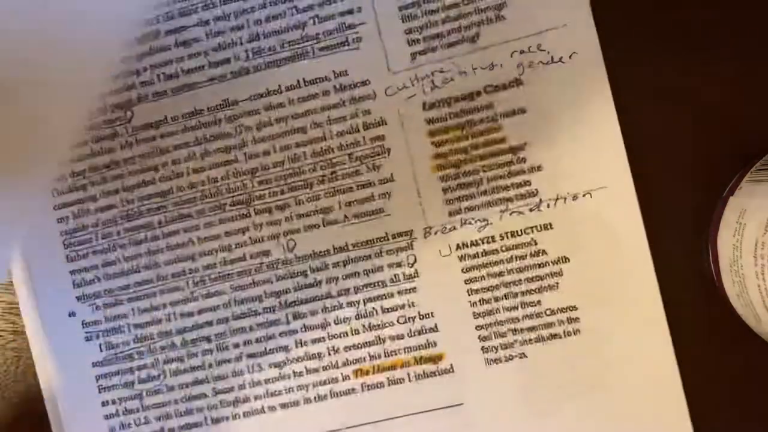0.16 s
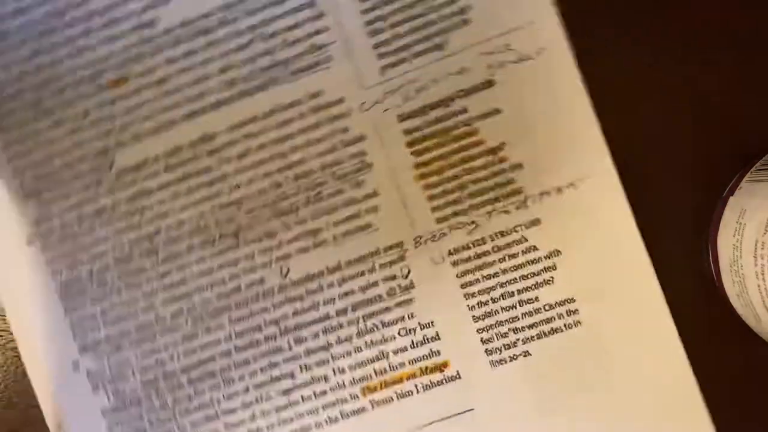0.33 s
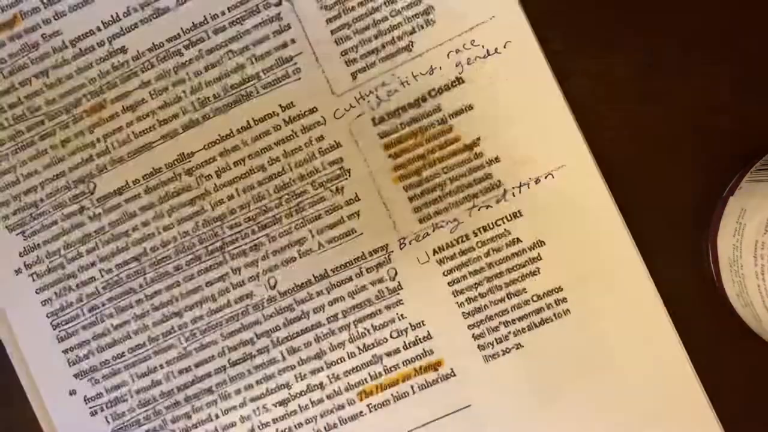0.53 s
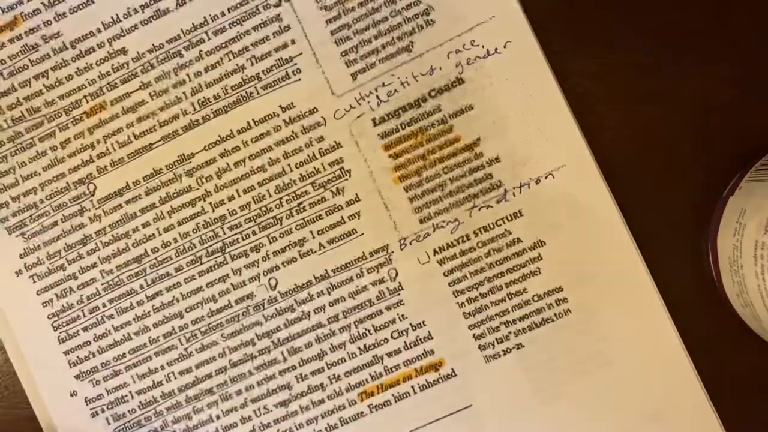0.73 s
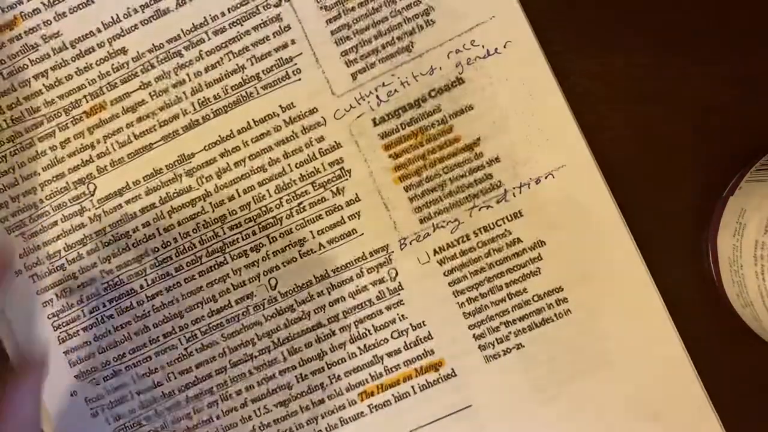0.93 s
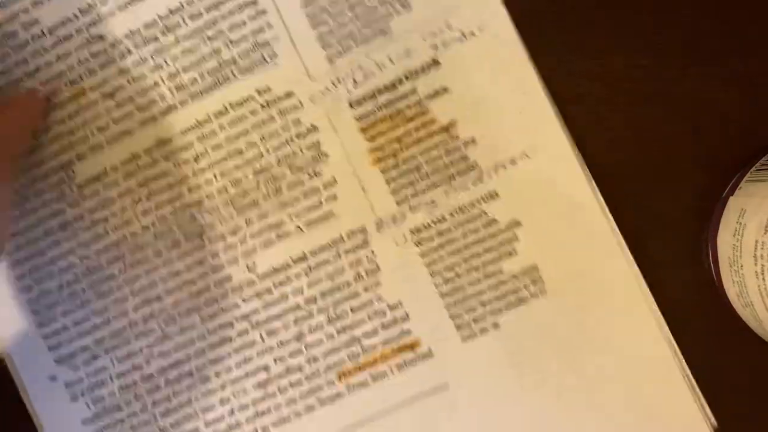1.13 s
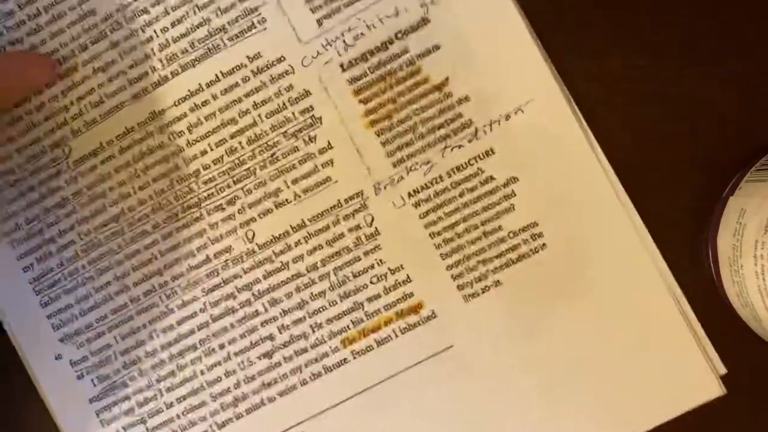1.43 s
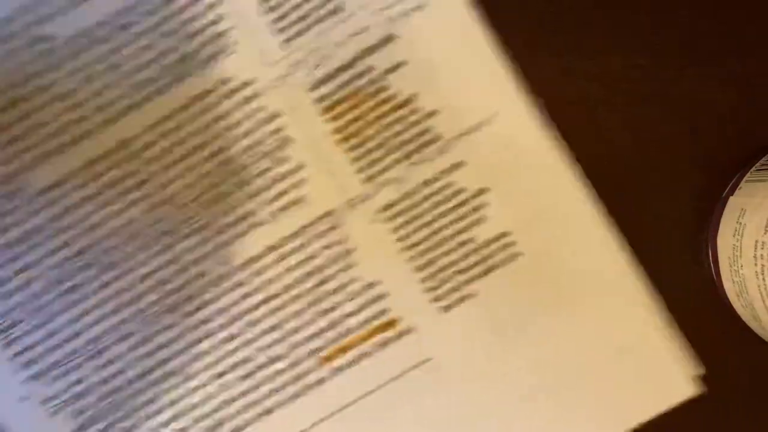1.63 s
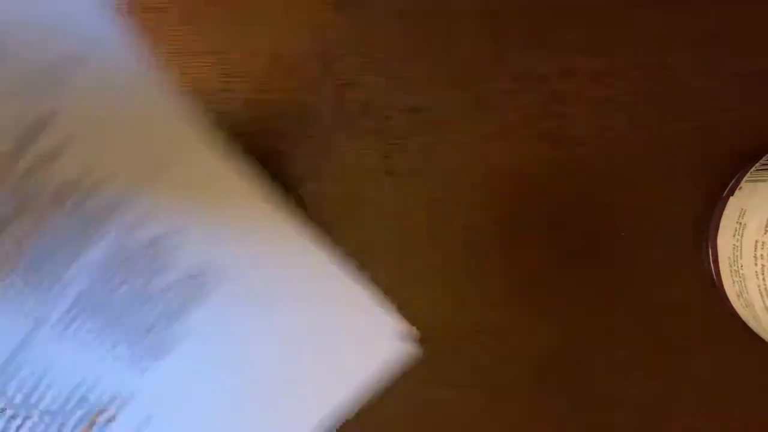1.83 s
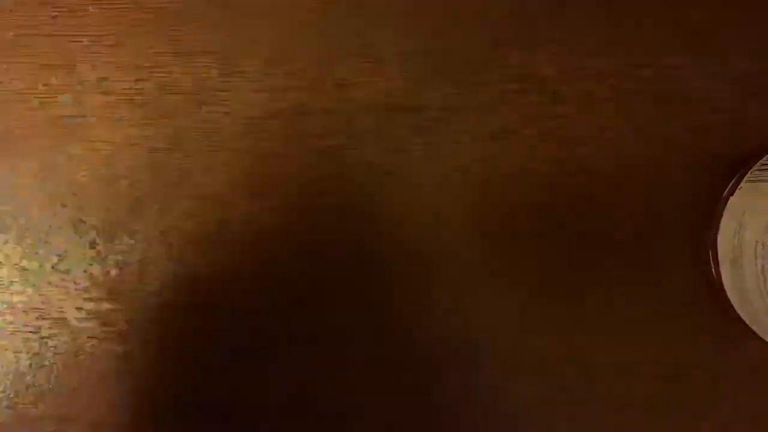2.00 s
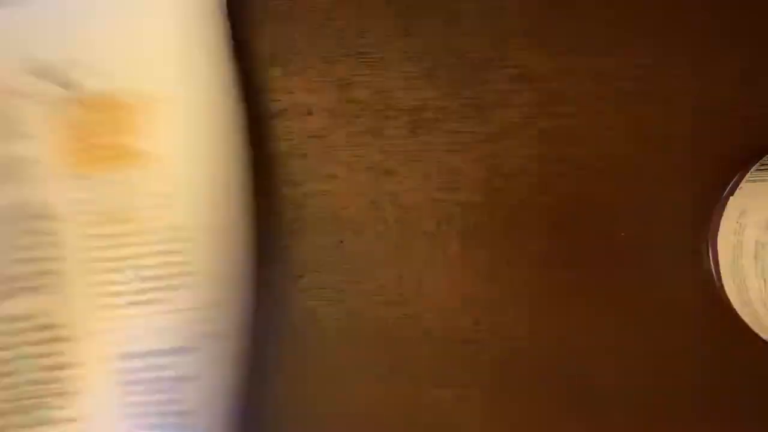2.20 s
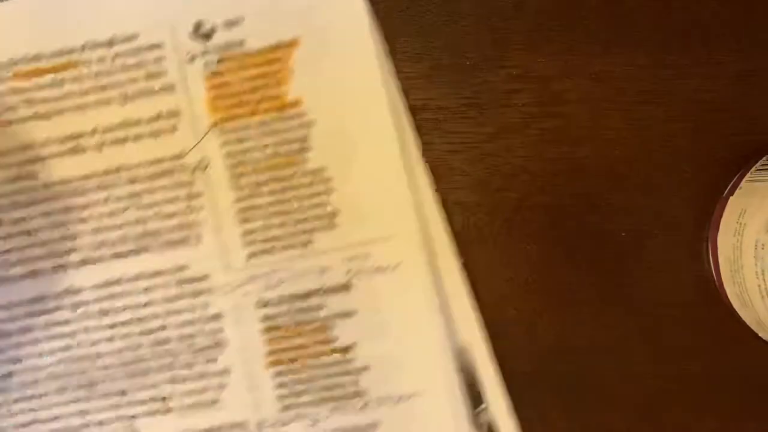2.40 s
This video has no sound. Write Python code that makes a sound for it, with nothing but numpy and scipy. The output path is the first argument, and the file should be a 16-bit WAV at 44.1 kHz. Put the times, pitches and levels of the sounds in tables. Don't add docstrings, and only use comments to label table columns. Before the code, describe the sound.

Stapled paper sheets crackle, slide and flip over a table top in a quiet room, heard close

```python
import sys
import numpy as np
from scipy import signal
from scipy.fft import rfft, irfft
from scipy.io import wavfile
from scipy.ndimage import uniform_filter1d

SR = 44100
rng = np.random.default_rng(int(sys.argv[2]) if len(sys.argv) > 2 else 0)


def store_wav(level_fs):
    pcm = np.round(np.clip(np.atleast_2d(level_fs), -1, 1) * 32767)
    wavfile.write(sys.argv[1], SR, pcm.T.astype(np.int16))


def amplitude_ratio(level_db):
    exponent = np.asarray(level_db, float) / 20
    return 10 ** exponent


N = 112454

# (frequency [Hz], density [dB per Hz])
AIR_COLOUR = [(20, -28), (60, 5), (125, -1.5), (250, -11), (500, -33.5), (1000, -23.5), (11000, -20.5),
              (16000, -25)]
# (frequency [Hz], lead of the left port [rad])
PORT_PHASE = [(0, 0), (350, .8), (600, 1.9), (1100, 2.7), (1400, 2.3), (1800, .4), (3400, .7), (5000, -.5),
              (6300, 0)]
# (frequency [Hz], left minus right [dB])
PORT_BALANCE = [(100, .5), (350, 3), (650, 16), (1300, 4), (2300, 8), (3000, 1), (4400, 8), (6200, 0)]
# (frequency [Hz], width [Hz], gain [linear])
HOLLOW_MODES = [(560, 125, 0.45), (3100, 144, 0.46), (4270, 150, 0.41), (4900, 360, 0.74)]
# (frequency [Hz], level [dB], t60 [s])
TABLE_MODES = [(51, -10, 0.25), (79, -1.5, 0.11), (128.4, -8, 0.48), (170.5, 7, 0.025), (254, 3, 0.064),
               (409, 7.5, 0.031)]
# (time [s], peak level [dB], push length [s])
THUDS = [(.226, -24.5, 0.0012), (0.255, -56, 0.0068), (0.285, -28.5, 0.00057), (0.358, -28, 0.0072),
         (1.581, -33, 0.007), (1.786, -31, 0.006), (1.948, -36, .008), (0.596, -46, 0.0026),
         (0.648, -25.5, 0.0022), (1.133, -34, 0.0014), (1.991, -28, 0.0018), (2.003, -21, 0.0044),
         (2.047, -29.5, 0.0036), (2.16, -29, 0.0031), (2.175, -23, 0.0046), (2.198, -21.5, 0.0015),
         (2.209, -19.5, 0.0041), (2.2235, -21.5, 0.0024), (2.243, -22, 0.0028)]
# (time [s], level [dB])
HAND_WEIGHT = [(0, -60.5), (.1, -66), (.19, -54.5), (.24, -40), (.4, -51), (.46, -60), (.53, -59),
               (.6, -44.5), (.72, -52.5), (0.878, -60), (1.04, -53.5), (1.2, -46), (1.27, -52),
               (1.45, -51.5), (1.63, -44.5), (1.72, -56), (1.941, -52.5), (2.06, -63.5)]
# (frequency [Hz], density [dB per Hz])
RUSTLE_COLOUR = [(35, -19), (80, -0.5), (240, 5), (420, -7), (650, -3), (1200, -3.5), (2000, -12.5),
                 (4000, -25.5)]
# (frequency [Hz], density [dB per Hz])
HISS_COLOUR = [(700, -12), (2000, -3), (3000, -2.5), (5500, -4.5), (7000, -0.5), (10000, -2), (13000, -3.5),
               (16000, -6)]
# (start [s], end [s], start level [dB], end level [dB], pitch [Hz])
SLIDES = [(-.02, 0.063, -40, -47, 4320), (0.083, 0.157, -58, -39, 3230), (0.161, 0.427, -47, -53.5, 3870),
          (0.43, 0.56, -48.5, -43.5, 4900), (0.554, 0.688, -34.5, -100, 3770),
          (0.75, 0.838, -43, -56.5, 3820), (0.894, 1.008, -62, -53.5, 3500),
          (1.009, 1.075, -43, -50.5, 4100), (1.08, 1.227, -58, -36, 5600),
          (1.209, 1.364, -39.5, -43.5, 3070), (1.373, 1.515, -34.5, -36, 3080),
          (1.5, 1.757, -39, -42, 2800), (1.754, 1.934, -44.5, -41.5, 3220),
          (1.972, 2.111, -50, -47.5, 4030), (2.377, 2.6, -60, -58, 9500), (2.162, 2.32, -39, -68.5, 2880)]
# (start [s], peak time [s], end [s], peak level [dB])
DRAGS = [
    (0.205, 0.23, 0.38, -35.5),
    (0.544, 0.57, 0.69, -35.5),
    (0.632, 0.662, 0.92, -41.5),
]
# (time [s], level [dB])
SLIPS = [
    (.541, -30),
    (0.556, -30),
    (.566, -45),
    (.574, -30),
    (0.582, -24.5),
    (0.59, -21.5),
    (0.599, -29.5),
    (.605, -46),
    (0.62, -35),
    (0.628, -36),
]
# (centre time [s], level [dB],
# pitch [Hz], half length [s])
BUCKLES = [(0.254, -47.5, 332, 0.059), (0.323, -45, 4260, 0.0083), (0.571, -39.5, 4440, 0.014),
           (0.653, -34.5, 2090, 0.0084), (0.679, -53.5, 3280, 0.048), (1.109, -36, 1950, 0.0073),
           (1.142, -45, 254, 0.023), (1.21, -46, 2400, 0.01), (1.649, -32.5, 2560, 0.0022),
           (1.65, -35, 1050, 0.018), (1.687, -31, 1380, 0.0065), (1.734, -33.5, 1070, 0.00096),
           (1.781, -38, 1180, 0.0055), (1.82, -37.5, 1620, 0.0038), (1.877, -42, 1200, 0.0033),
           (1.927, -42.5, 2010, 0.016), (1.99, -40, 1450, 0.0043), (2.007, -46.5, 890, 0.012),
           (1.486, -36, 10400, 0.019), (2.294, -51.5, 11500, 0.019), (2.172, -35.5, 1070, 0.0097),
           (2.207, -35.5, 3100, 0.0029), (2.21, -40, 1080, 0.012)]
# (time [s], peak level [dB], pitch [Hz], ring-out [s])
TICKS = [(0.64, -36, 11000, .002), (.639, -26, 10000, .0015), (.9775, -44, 2800, .002),
         (2.2, -38, 3000, .002), (2.191, -36, 10000, .001), (2.237, -33, 7000, 0.0018),
         (2.484, -35, 10000, 0.0027), (1.088, -24.5, 250, .01), (1.079, -22.5, 1450, 0.0045),
         (0.25, -33, 11000, .003), (2.4, -35, 11000, .002), (.265, -30, 280, 0.013),
         (1.872, -38.5, 3700, 0.011)]
# (time [s], peak level [dB], pitch [Hz], ring-out [s])
POPS = [(.199, -32, 1530, 0.011), (.212, -28, 1520, 0.006), (.639, -32.5, 4600, 0.0027),
        (.647, -31, 2300, 0.0045), (.6545, -38, 4530, 0.0024), (1.0772, -20.5, 5000, 0.0012),
        (1.099, -36, 5050, 0.0031), (1.109, -40, 5000, 0.0028), (1.204, -32, 2830, .005),
        (1.224, -31.5, 936, 0.0034), (1.6455, -24, 3220, 0.0049), (1.646, -26.5, 1870, 0.0038),
        (1.684, -31, 1840, 0.0033), (1.776, -31, 1680, 0.0054), (1.778, -30.5, 1120, 0.0048),
        (1.817, -32.5, 1930, .004), (1.917, -39, 2840, 0.0022), (1.932, -39, 4200, 0.011),
        (1.989, -41, 2590, 0.0067), (2.021, -42.5, 4130, 0.0062), (2.048, -46, 1530, 0.0028),
        (2.172, -34, 2940, 0.0036), (2.176, -29, 1170, 0.003), (2.204, -22.5, 3100, 0.0021),
        (2.237, -32, 1360, .002)]
# (time [s], peak level [dB], pitch of the sheet [Hz], ring-out [s])
CRACKS = [(0.2224, -8, 1400, 0.0018), (0.2244, -13.5, 443, 0.0024), (.233, -20, 298, 0.003),
          (.255, -28.5, 400, 0.004), (.277, -21, 347, 0.0089), (.291, -35, 322, .006),
          (.345, -34.5, 300, 0.0081), (.375, -34, 660, 0.015), (1.128, -30.5, 307, 0.0092),
          (1.184, -29, 270, 0.0042), (1.229, -31.5, 293, 0.0031), (1.978, -35, 805, 0.0062),
          (0.277, -30, 4300, 0.0047), (0.2901, -21, 2480, 0.0024), (.336, -30, 2180, 0.0067),
          (.639, -22, 730, 0.0042), (0.891, -43.5, 3000, 0.0098), (0.979, -35.5, 660, 0.0064),
          (1.047, -33, 654, 0.01), (1.0768, -20.5, 4440, 0.0018), (1.0785, -15, 1320, 0.0029),
          (1.098, -24, 4900, 0.0092), (1.125, -24, 675, 0.0042), (1.179, -49, 815, 0.0054),
          (1.573, -36, 684, 0.0085), (1.765, -24.5, 930, 0.0094), (2.156, -26.5, 3660, 0.0019),
          (2.196, -25.5, 700, 0.0049), (2.236, -21, 530, 0.0017), (2.2386, -31.5, 2900, 0.001),
          (2.484, -38.5, 3440, 0.0027)]


def level(x, db):
    return x * amplitude_ratio(db) / np.sqrt(np.mean(x ** 2))


def band(x, hz, width):
    return signal.lfilter(*signal.iirpeak(min(hz, 0.45 * SR), hz / width, fs=SR), x)


def low_pass(x, order, hz):
    return signal.sosfilt(signal.butter(order, hz, fs=SR, output="sos"), x)


def colour(x, table):
    size = 4096
    hz, db = np.array(table).T
    f = np.maximum(np.arange(size // 2 + 1) * SR / size, 1)
    log_gain = np.interp(np.log(f), np.log(hz), np.maximum(db, -60)) * np.log(10) / 20
    cepstrum = irfft(log_gain)
    cepstrum[1:size // 2] *= 2
    cepstrum[size // 2 + 1:] = 0
    return signal.fftconvolve(x, irfft(np.exp(rfft(cepstrum))))[:len(x)]


def walk(rate):
    hold = int(SR / rate)
    steps = np.repeat(rng.standard_normal(N // hold + 1), hold)[:N]
    return 1.3 * uniform_filter1d(uniform_filter1d(steps, hold), hold)


def fibres(size, scatter_db):
    spread = scatter_db * rng.exponential(size=size).clip(0, 4)
    return level(rng.standard_normal(size) * amplitude_ratio(spread), 0)


def sheet(x, hz, width, broad_db):
    ring = band(band(x, hz, width * hz), hz, 2 * width * hz)
    return 2 * ring + amplitude_ratio(broad_db) * band(x, 2200, 6300)


def room_rumble():
    hz, rumble_db = 68, -57
    noise = rng.standard_normal((2, N))
    shared, side = level(band(band(noise, hz, 33), hz, 63), rumble_db)
    return (shared + 0.5 * side * np.array([[1], [-1]])) * amplitude_ratio(2 * walk(8))


def room_air():
    return level(colour(rng.standard_normal(N), AIR_COLOUR), -57.5)


def reflect(x, echoes, db):
    energy = (echoes ** 2).sum(1, keepdims=True)
    return signal.fftconvolve(x[None], echoes / np.sqrt(energy))[:, :N] * amplitude_ratio(db)


def room(x):
    t60_s, tail_db = 0.2, -11
    t = np.arange(SR // 2) / SR
    tails = rng.standard_normal((2, len(t))) * amplitude_ratio(-60 * t / t60_s) * (t > 0.002)
    return reflect(x, low_pass(band(tails, 1100, 4500), 8, 5800), tail_db)


def scatter(x):
    decay_s, scatter_db = 0.002, -12
    t = np.arange(SR // 50) / SR
    early = rng.standard_normal((2, len(t))) * np.exp(-t / decay_s)
    return reflect(x, low_pass(early, 6, 6500), scatter_db)


def ports(x):
    flip_hz, flip_width_hz = (7950, 10000, 12200, 14200), 1250
    f = np.arange(N // 2 + 1) * SR / N
    phase_hz, phase = np.array(PORT_PHASE).T
    balance_hz, balance_db = np.array(PORT_BALANCE).T
    flips = sum(np.clip((f - hz) / flip_width_hz + 0.5, 0, 1) for hz in flip_hz)
    lead = np.interp(f, phase_hz, phase) - np.pi * flips
    left = amplitude_ratio(np.interp(np.log(f + 1), np.log(balance_hz), balance_db) / 2)
    return irfft(rfft(x) * np.array([left, np.exp(-1j * lead) / left]), N)


def hollow(x):
    return sum(gain * band(x, hz, width) for hz, width, gain in HOLLOW_MODES)


def thuds():
    t, push = np.arange(N) / SR, np.zeros(N)
    for time, db, length in THUDS:
        shape = np.exp(-((t - time) / (length / 2)) ** 2)
        push += amplitude_ratio(db) * shape * 2 / (length * SR)
    ring_t, ring = t[:SR // 2], 0
    for hz, db, t60 in TABLE_MODES:
        ring = ring + amplitude_ratio(db) * np.sin(2 * np.pi * hz * ring_t) * amplitude_ratio(-60 * ring_t / t60)
    return signal.fftconvolve(push, ring)[:N] * amplitude_ratio(-10)


def rub():
    scatter_db, edge_s, peak_db = 3, 0.015, -1.5
    t, slides = np.arange(N) / SR, 0
    gust = 1.5 * walk(25.33)
    hiss = level(colour(fibres(N, scatter_db), HISS_COLOUR), -3)
    hiss = hiss * amplitude_ratio(gust + 1.64 * walk(58.76))
    for start, end, start_db, end_db, hz in SLIDES:
        gate = np.clip(np.minimum(t - start, end - t) / edge_s + 0.5, 0, 1)
        env = gate * amplitude_ratio(np.interp(t, [start, end], [start_db, end_db]))
        slides = slides + env * (0.76 * hiss + amplitude_ratio(peak_db) * band(hiss, hz, 0.48 * hz))
    rustle = level(colour(fibres(N, scatter_db), RUSTLE_COLOUR), 4)
    rustle = rustle * amplitude_ratio(0.5 * gust + 2.8 * walk(45))
    time, db = np.array(HAND_WEIGHT).T
    weight = np.interp(t, np.append(time, time[-1] + 0.1), np.append(db, -90))
    return slides + rustle * amplitude_ratio(weight)


def drags():
    hz, width_hz, slip_s = 1402, 140, 0.0033
    t, env = np.arange(N) / SR, 0
    for start, peak, end, db in DRAGS:
        swell = np.interp(t, [start, start + 0.002, peak, end], [0, 0.65, 1, 0])
        env = env + amplitude_ratio(db) * swell ** 1.5
    for time, db in SLIPS:
        onset = np.clip((t - time) / 0.0015, 0, 1)
        env = env + amplitude_ratio(db) * onset * np.exp(-np.abs(t - time) / slip_s)
    slip = fibres(N, 2.5) * amplitude_ratio(2.5 * walk(120))
    pair = band(slip, 0.925 * hz, width_hz) - band(slip, 1.034 * hz, width_hz)
    tone = level(band(pair, hz, 400), 0)
    return env * (tone + level(band(slip, 2070, 1500), -12))


def buckles():
    lead_s = 0.1
    out, size = np.zeros(2 * N), SR // 5
    t = np.arange(size) / SR - lead_s
    for time, db, hz, half in BUCKLES:
        i = int((time - lead_s) * SR)
        crackle = sheet(fibres(size, 5), hz, 0.73, -16.5)
        out[i:i + size] += level(crackle, db) * np.exp(-np.abs(t / half) ** 1.37) * amplitude_ratio(3)
    return out[:N]


def cracks(table, width, broad_db):
    rise_s, scatter_db, gain_db = 0.00042, 4.5, 0.5
    out, size = np.zeros(2 * N), SR // 5
    t = np.arange(size) / SR
    for time, db, hz, length in table:
        env = (1 - np.exp(-t / rise_s)) * np.exp(-t / max(length, 0.001))
        burst = env * fibres(size, scatter_db)
        burst[int(0.0006 * SR)] -= 3
        sound = sheet(burst, hz, width, broad_db)
        i = int(time * SR)
        out[i:i + size] += sound / np.abs(sound).max() * amplitude_ratio(db + gain_db)
    return out[:N]


def scene():
    rumble, air = room_rumble(), room_air()
    snaps = cracks(CRACKS, 0.69, -10.5)
    pops = cracks(POPS, 0.19, -33)
    ticks = cracks(TICKS, 0.91, -8)
    paper = snaps + pops + buckles() + rub()
    paper = paper + hollow(paper) + drags()
    near = paper + ticks + air
    aside = amplitude_ratio(-8.5) * band(snaps, 9300, 4700) * np.array([[1], [0]])
    return ports(near + thuds()) + rumble + aside + room(paper + air) + scatter(near)


def top_cut(x):
    return signal.sosfilt(signal.butter(12, 17100, fs=SR, output="sos"), x)


def record(dry):
    low_cut_hz, top_hz = 46, 15650
    mix = signal.sosfilt(signal.butter(4, low_cut_hz, "high", fs=SR, output="sos"), dry)
    mix = signal.sosfilt(signal.cheby1(10, 0.5, top_hz, fs=SR, output="sos"), mix)
    return top_cut(mix)


dry = scene()
out = record(dry)
store_wav(out)
```